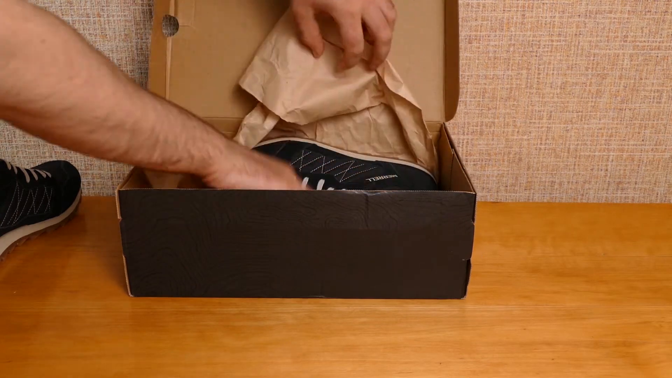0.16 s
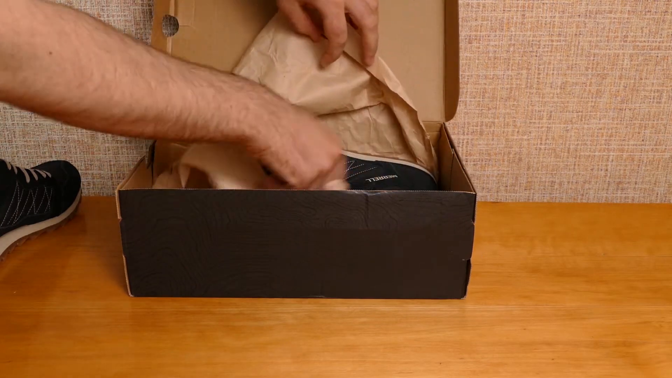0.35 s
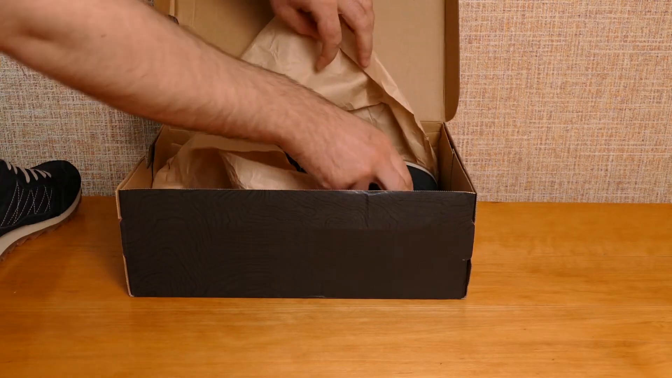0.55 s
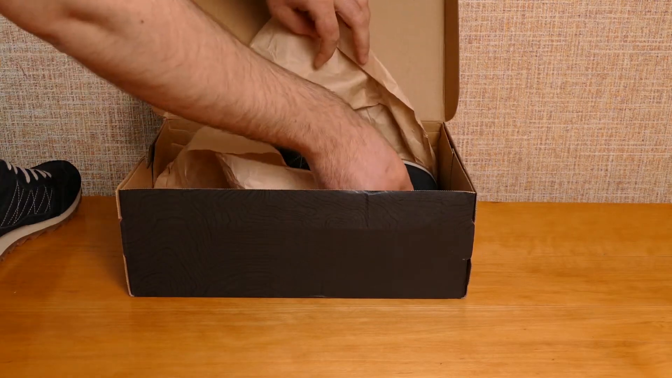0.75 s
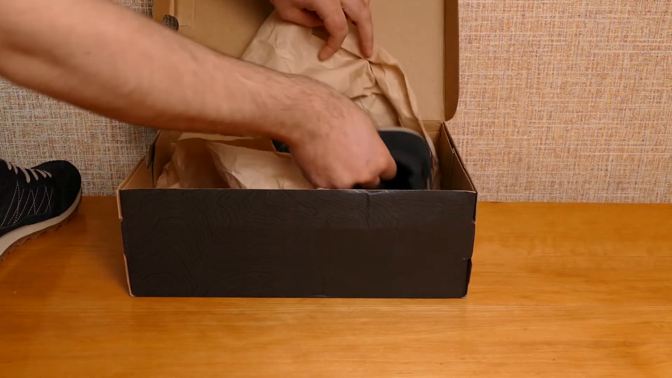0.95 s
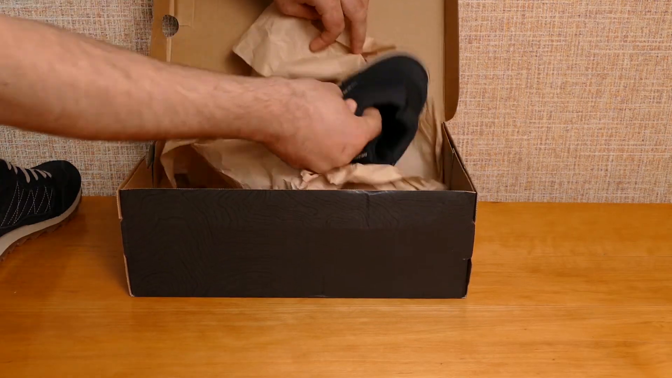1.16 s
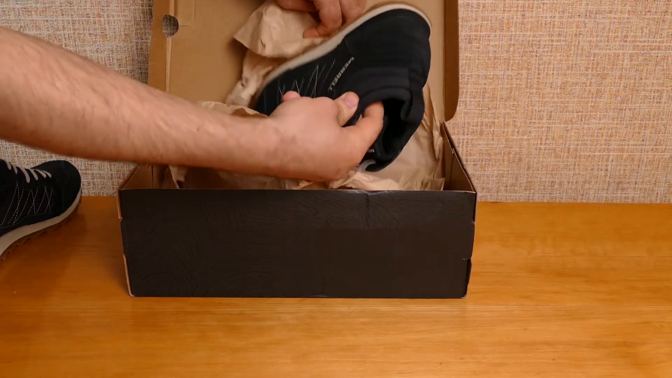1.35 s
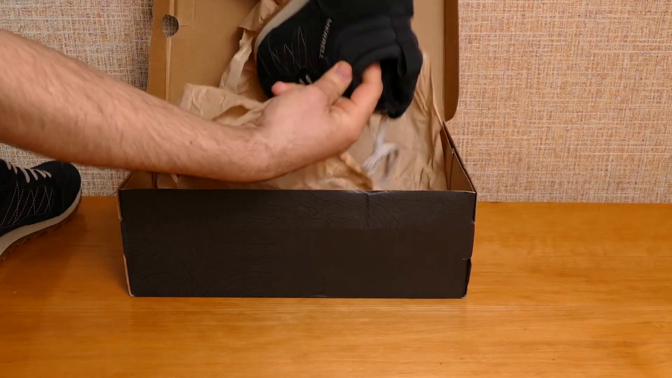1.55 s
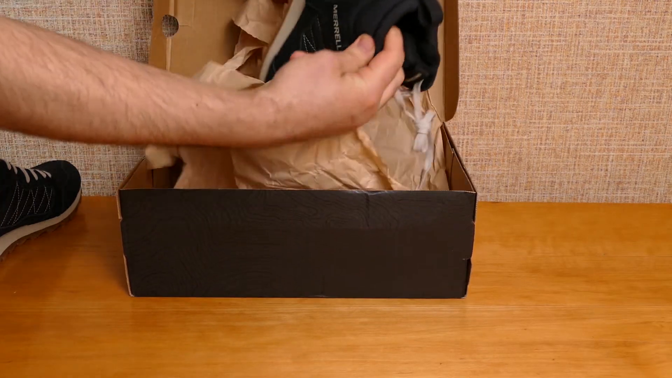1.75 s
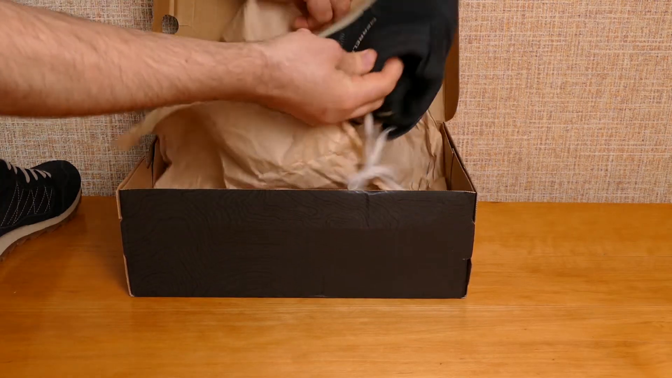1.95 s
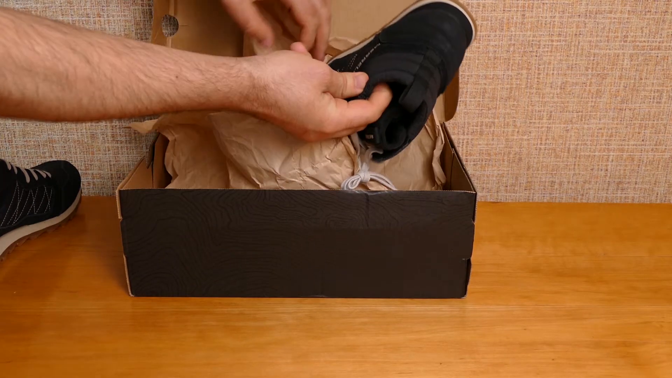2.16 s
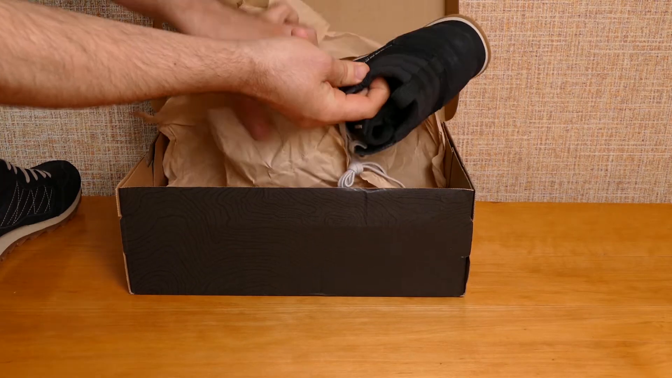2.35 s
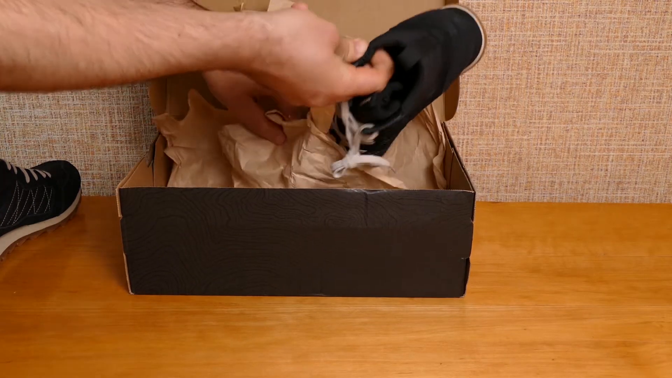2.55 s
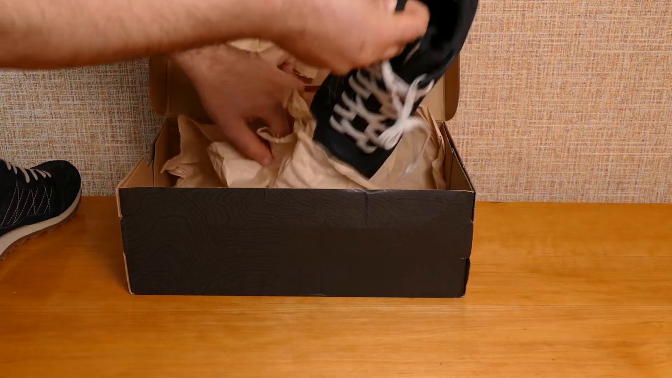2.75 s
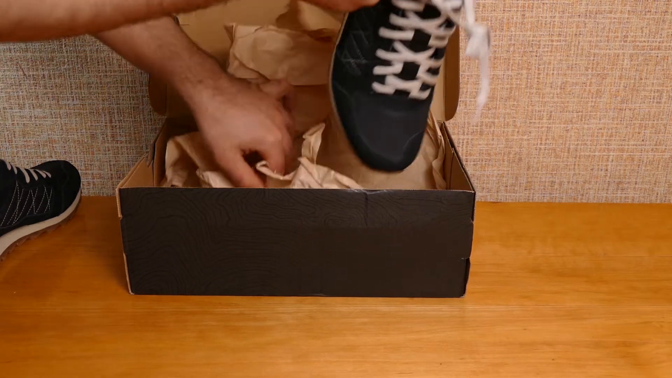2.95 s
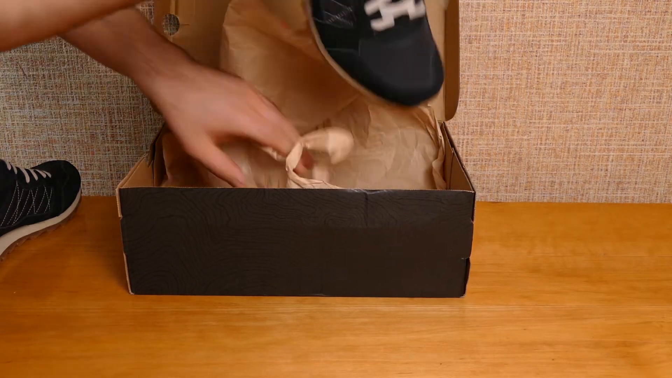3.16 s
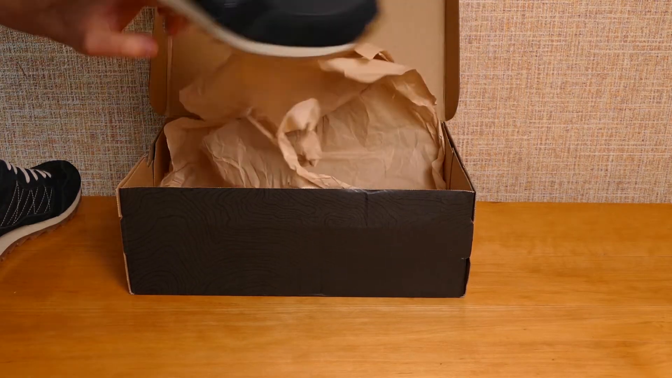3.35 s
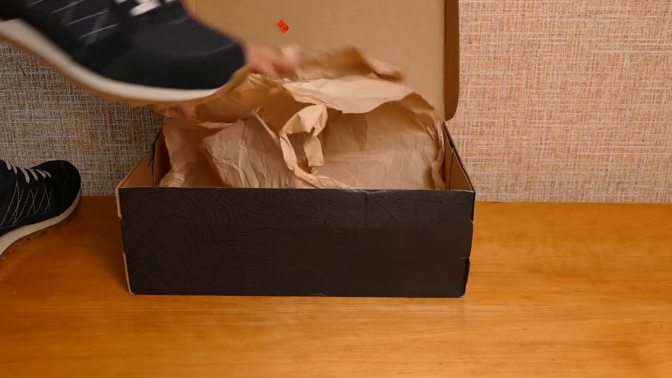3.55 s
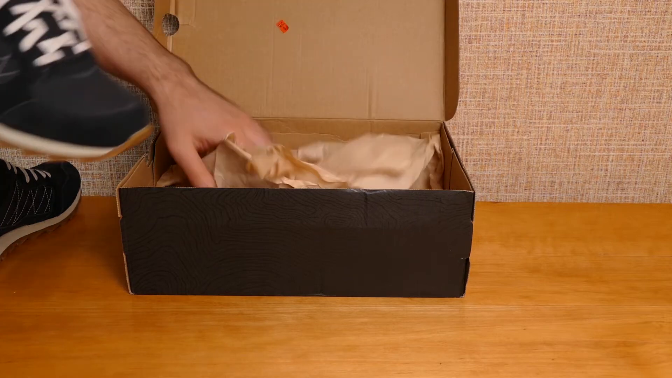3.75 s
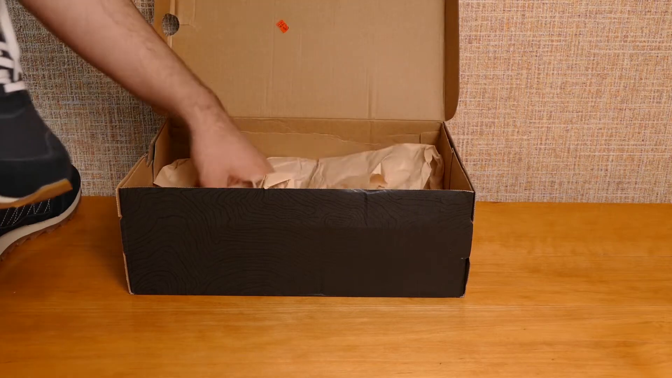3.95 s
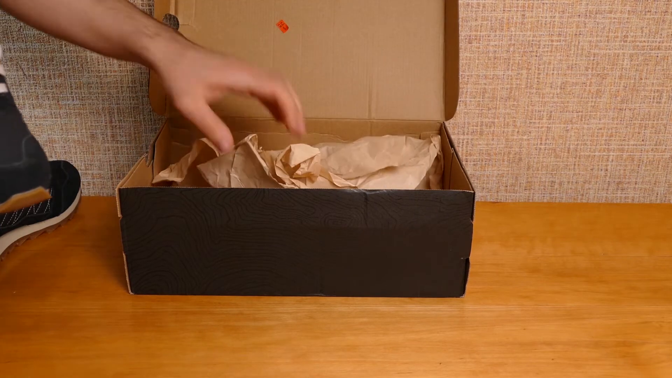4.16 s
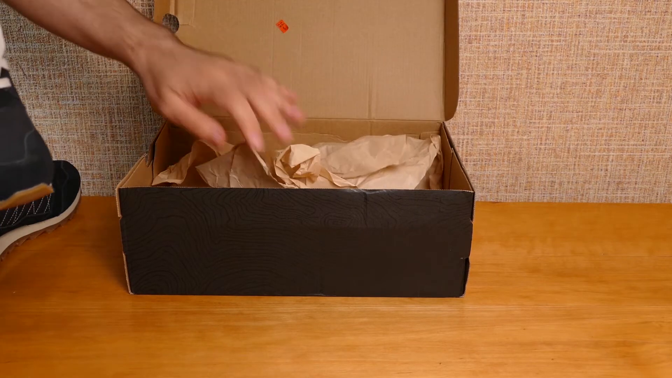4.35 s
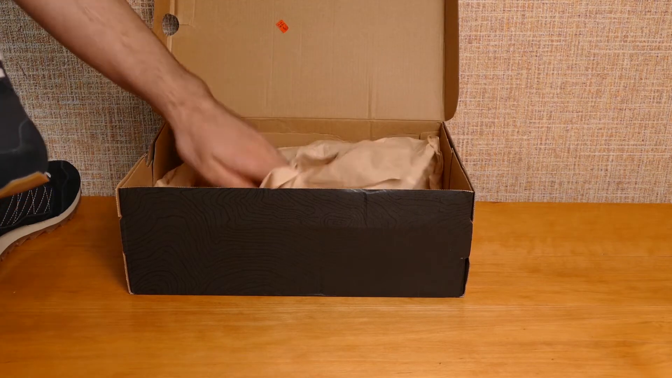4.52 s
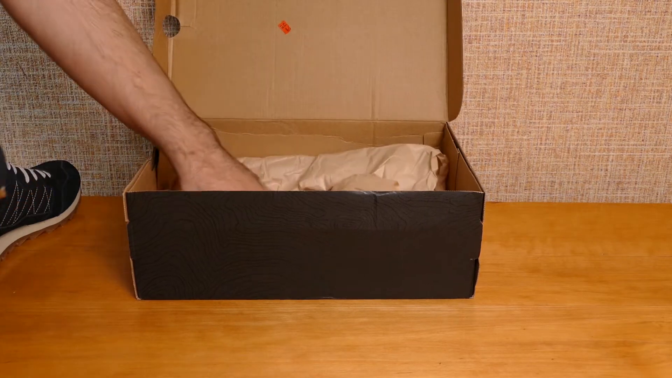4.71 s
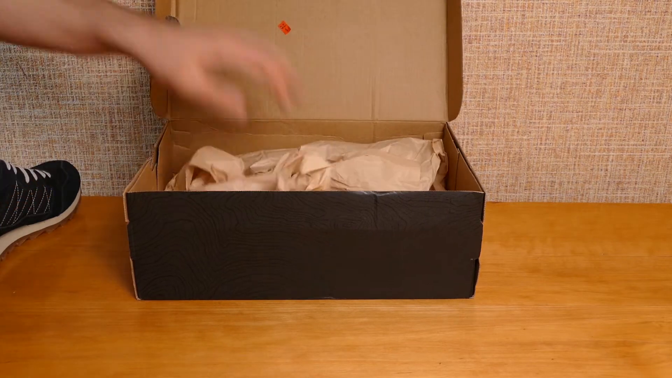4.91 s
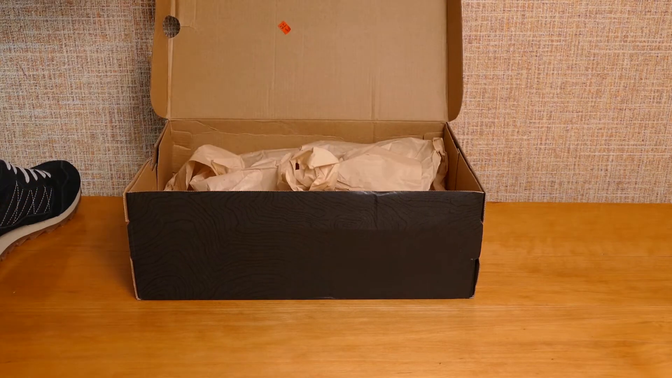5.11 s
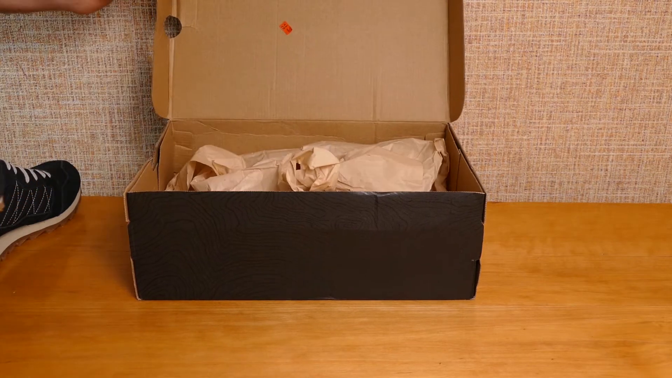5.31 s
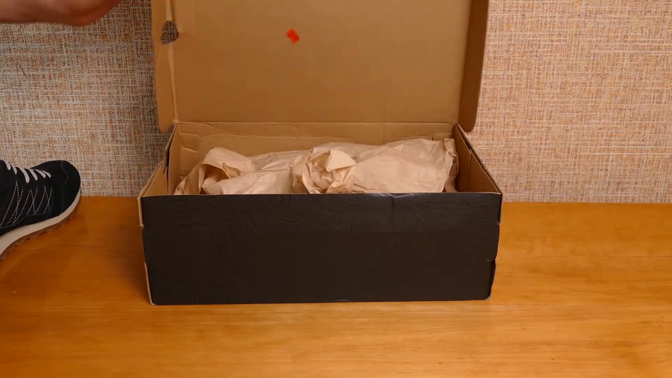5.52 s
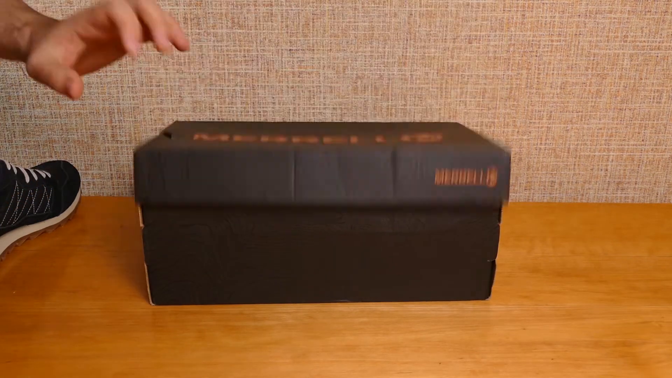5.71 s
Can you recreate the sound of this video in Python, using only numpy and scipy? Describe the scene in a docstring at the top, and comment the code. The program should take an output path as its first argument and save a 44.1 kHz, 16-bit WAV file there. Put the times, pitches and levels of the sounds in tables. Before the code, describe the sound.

Busy dry paper crinkling in a small room, strokes coming and going, hollow cardboard bumps beneath, then a box lid cracks and scrapes shut.

```python
"""Hands sweep packing paper aside in a cardboard shoebox, draw out a shoe, peel off its wrapping, stuff the
paper back and press it flat; at last the lid scrapes shut. At each stroke, and as the paper springs back,
flurries of clicks ring the facets of the sheet; single creases crack, folds pop as they flip, and soft
knocks excite the modes of the box. Underneath lies a faint hush with a narrow steady hiss.
The stereo microphone stands about a metre away in a small furnished room."""
import sys
import numpy as np
from scipy import signal
from scipy.fft import rfft, irfft
from scipy.io import wavfile
from scipy.ndimage import uniform_filter1d

SR = 44100
rng = np.random.default_rng(int(sys.argv[2]) if len(sys.argv) > 2 else 0)


def inscribe(sig):
    """Save sig as 16-bit PCM at rate SR to the path in sys.argv[1].

    A 1-D sig is mono; a 2-D sig holds one channel per row.
    Samples are clipped to [-1, 1] before scaling.
    """
    pcm = np.round(np.clip(np.atleast_2d(sig).T, -1, 1) * 32767)
    wavfile.write(sys.argv[1], SR, pcm.astype(np.int16))


N = 259308
TIME = np.arange(N) / SR


def undb(db):
    """Decibels to gain."""
    return 10 ** (np.asarray(db) / 20)


def unit(x):
    """Scale to rms 1."""
    return x / np.sqrt(np.mean(x ** 2))


def fade(t, t60):
    """Exponential decay by 60 dB in t60 seconds."""
    return np.exp(-np.log(1000) * t / t60)


def convolve(x, response):
    """Pass a sound through an impulse response."""
    return signal.fftconvolve(x, response)[:len(x)]


def filter_sos(x, order, hz, kind="lowpass"):
    """Causal Butterworth filter."""
    return signal.sosfilt(signal.butter(order, hz, kind, fs=SR, output="sos"), x)


def colour(x, points, size=4096):
    """Minimum-phase filter through (f/Hz, level/dB) points; white noise keeps its power."""
    hz, db = np.transpose(points)
    bins_hz = np.fft.rfftfreq(size, 1 / SR)
    gain = unit(undb(np.interp(np.log(bins_hz + 1), np.log(hz), db)))
    # folding the cepstrum forward makes the response causal
    cepstrum = irfft(np.log(gain))
    cepstrum[1:size // 2] *= 2
    cepstrum[size // 2 + 1:] = 0
    return convolve(x, irfft(np.exp(rfft(cepstrum))))


def walk(rate):
    """Smooth random wander with a spread of about 1, drawn afresh `rate` times a second."""
    k = int(SR / rate)
    steps = np.repeat(rng.standard_normal(N // k + 1), k)
    return unit(uniform_filter1d(steps, k)[:N])


def burst(t60):
    """The ring of countless equally strong damped modes: a short decaying noise with an even spectrum."""
    t = np.arange(int(t60 * SR)) / SR
    envelope = fade(t, t60)
    ring = rng.standard_normal(SR)[:len(t)] * envelope
    # flatten the spectrum and restore the decay by turns
    for _ in range(3):
        even = irfft(np.exp(1j * np.angle(rfft(ring))), len(t))
        power = uniform_filter1d(even ** 2, size=len(t) // 8)
        ring = even * envelope / np.sqrt(np.abs(power) + 1e-15)
    return ring


def add(track, s, sound):
    """Mix a sound in at time s."""
    i = int(s * SR)
    track[i:i + len(sound)] += sound[:N - i]


def paper():
    """The same clicks tick in the creases, ring the wider sheets and drum on the cardboard under them."""
    # the cardboard's colour: f/Hz, level/dB
    wall_colour = [(40, -38.5), (92, -24), (135, -13), (200, -0.5), (320, 0.5), (405, 7), (510, 2),
                   (660, 2.5), (1020, 3), (1400, 3.5), (3000, -34.5)]
    creases_db, sheets_db, walls_db = 0.45, 0.7, -0.5
    effort, flex, pressure = handling()
    crease_db = 20 * np.log10(effort)
    clicks = buckling(per_s=1400, spread_db=2.0, flurry_db=0.0, shift_db=1.0, count=24)
    walls = colour(facets(clicks, t60=0.063), wall_colour)
    ticking = effort * creases(clicks, crease_db, firm_db=-45.5, dulling=0.42)
    ringing = flex * sheets(clicks, crease_db)
    return undb(creases_db) * ticking + undb(sheets_db) * ringing + undb(walls_db) * pressure * walls


def handling():
    """Gains of creases, sheets and box: the hand pushes in each stroke, then the paper springs back."""
    # strokes of the hands: the top sheet is swept aside; from 0.42 s fingers find the shoe and draw it out;
    # from 1.96 s its wrapping is peeled off; from 3.55 s the paper is stuffed back, from 4.41 s pressed
    # flat; at 5.2 s it stirs as the box is nudged.
    # t/s, attack/s, hold/s, crease level/dB, flexing of sheets re creases/dB, pressure on the box
    # re creases/dB, spring-back re push/dB, spring-back hold/s
    strokes = [ (0.0, 0.00067, 0.0025, -36, -1, -4.5, -4.5, 0.18),
               (0.123, 0.066, 0.037, -38, -1, -10.5, -8.5, 0.2),
               (0.422, 0.033, 0.022, -47.5, 0, -13, -7, 0.069),
               (0.562, 0.02, 0.04, -53.5, -13, -15, -3, 0.03),
               (0.613, 0.04, 0.032, -51, -0.5, -11.5, -9, 0.09),
               (0.753, 0.064, 0.058, -44.5, -6, -15.5, -2, 0.13),
               (0.921, 0.14, 0.044, -46, 2.5, -7, -5.5, 0.045),
               (1.125, 0.036, 0.077, -41.5, -5, -14, -3.5, 0.11),
               (1.366, 0.0043, 0.035, -44.5, -0.5, -11, -1, 0.12),
               (1.51, 0.026, 0.1, -43, -1, -14, -6, 0.18), (1.786, 0.029, 0.066, -57.5, -3, -13, 1.5, 0.14),
               (1.958, 0.022, 0.067, -42.5, -6.5, -16.5, -3, 0.17),
               (2.24, 0.012, 0.16, -46.5, -4.5, -16, -4, 0.047),
               (2.364, 0.12, 0.1, -42.5, 0, -12, -3, 0.12),
               (2.695, 0.071, 0.047, -48, -1.5, -9, -14, 0.028),
               (2.837, 0.0055, 0.058, -46, -8, -14, -5.5, 0.18),
               (3.008, 0.03, 0.24, -53.5, -6.5, -14, -16.5, 0.23),
               (3.545, 0.0068, 0.04, -57, -23, -13, -10, .03),
               (3.575, 0.025, 0.1, -47, -5.5, -6, 1.5, 0.18),
               (3.683, 0.2, 0.075, -42.5, -9, -1, -12, 0.056),
               (3.988, 0.047, 0.13, -48, -8, -10, -29, 0.068),
               (4.411, 0.005, 0.017, -61, -10, -12.5, 5, 0.024),
               (4.428, 0.023, 0.017, -47, -13, -7, -1, 0.12),
               (4.574, 0.074, 0.025, -37.5, -2, -6, -13, 0.24),
               (4.871, 0.032, 0.062, -52.5, -8, -13.5, -13, 0.078),
               (5.204, 0.053, 0.021, -64.5, -17, -8, -14.5, 0.24)]
    spring_flex_db, spring_pressure_db = -2.5, -15.5  # re creases, once the hand lets go
    power = np.zeros((3, N))
    for s, attack, hold, db, flex_db, pressure_db, spring_db, spring_s in strokes:
        push = undb(db) * gesture(s, attack, hold)
        power += np.outer(undb([0, flex_db, pressure_db]), push) ** 2
        spring = undb(db + spring_db) * gesture(s + hold, attack, spring_s)
        # the box is left halfway, in dB, between the stroke's pressure and that of loose paper
        left_pressure_db = (pressure_db + spring_pressure_db) / 2
        power += np.outer(undb([0, spring_flex_db, left_pressure_db]), spring) ** 2
    return np.sqrt(power + 1e-14)


def gesture(start, attack, hold):
    """Rises, holds and dies away as the paper comes to rest."""
    release_t60_s = 0.22
    t = TIME - start
    return np.clip(t / attack, 0, 1) * fade(np.maximum(t - attack - hold, 0), release_t60_s)


def buckling(per_s, spread_db, flurry_db, shift_db, count):
    """Click trains, one per facet or contact: they come in flurries, and the load shifts between them."""
    flurry = undb(flurry_db * walk(70))
    trains = np.zeros((count, N))
    for train in trains:
        when, size, side = rng.random((int(per_s * N / SR / count), 3)).T
        train[(when * N).astype(int)] = np.sign(side - .5) * undb(-spread_db * np.log(size + 0.023))
        train *= flurry * undb(shift_db * walk(12))
    # the hand feeds in energy evenly, however the clicks share it out
    power = uniform_filter1d(np.sum(trains ** 2, axis=0), int(.06 * SR))
    return trains / np.sqrt(np.abs(power) + 1e-9)


def facets(trains, t60):
    """Every facet answers its clicks with its own short ring."""
    rings = [burst(t60 * rng.uniform(0.41, 1.66)) for _ in trains]
    answers = (signal.oaconvolve(train, ring / np.linalg.norm(ring))[:N] for train, ring in zip(trains, rings))
    return unit(sum(answers))


def creases(clicks, crease_db, firm_db, dulling):
    """Creases tick as sheet rubs on sheet, stiffer ones crunch; a gentle touch dulls the treble."""
    # f/Hz, level/dB
    crease_colour = [(500, -63), (1500, -6), (2900, -2.5), (3800, -1), (5200, -3), (6500, -6), (8200, -8),
                     (9500, -3.5), (11000, -7), (12200, -11), (12600, -16.5), (15000, -31)]
    crinkle_db = -4.5  # crunches re the even ticking
    crinkle_merge = .25  # dB the crunches lose per dB of a firmer stroke, as they run together
    ticks = facets(clicks, t60=0.0043) + undb(-5) * rng.standard_normal(N)
    share = undb(crinkle_db - crinkle_merge * np.maximum(crease_db - firm_db, 0))
    runs = avalanches(per_s=130, spread_db=8.5, length_s=0.0054)
    crunch = np.hypot(1, share * runs) / np.hypot(1, share)
    sound = colour(ticks * crunch, crease_colour)
    body = signal.sosfiltfilt(signal.butter(4, 6300, fs=SR, output="sos"), sound)
    treble = sound - body
    treble_db = np.clip(dulling * (crease_db - firm_db), -7, .3) + 1.15 * walk(35)  # and it flickers
    return body + undb(treble_db) * treble


def avalanches(per_s, spread_db, length_s):
    """Gain of the crunches: a stiff crease trips its neighbours in a run that swells and dies in milliseconds."""
    triggers = np.zeros(N)
    when, size = rng.random((int(per_s * N / SR), 2)).T
    triggers[(when * N).astype(int)] = undb(spread_db * size) ** 2
    swell = np.hanning(int(length_s * SR)) ** 2
    return unit(np.sqrt(np.abs(signal.fftconvolve(triggers, swell, "same"))))


def sheets(clicks, crease_db):
    """A bent sheet rings from its lowest mode upward; a harder stroke bends a wider, deeper sheet."""
    # f/Hz, level/dB
    sheet_colour = [(600, -8.5), (1000, -3), (1450, -2.5), (2000, -1.5), (2400, -2), (2900, -10.5)]
    wad_hz = 1435  # lowest mode of a tight wad
    opening_db, octave_db = -49.5, 12.5  # crease level that starts to open it, rise that halves the mode
    hz = np.geomspace(600, 2900, num=10)
    lowest_hz = wad_hz * .5 ** (np.maximum(crease_db - opening_db, 0) / octave_db)
    level = undb(np.interp(hz, *np.transpose(sheet_colour))) * np.sqrt(hz / 6500)
    weight = level[:, None] / (1 + (lowest_hz / hz[:, None]) ** 12)
    return np.sum(weight * patches(facets(clicks, t60=.016), hz, patchy_db=-1.77, rate=24), axis=0)


def patches(noise, centres_hz, patchy_db, rate):
    """Split a sound into bands that each swell and ebb alone, as folds open and close."""
    edge = np.sqrt(centres_hz[1] / centres_hz[0])
    bands = [filter_sos(noise, 3, (hz / edge, hz * edge), "bandpass") for hz in centres_hz]
    return np.array([unit(band * undb(patchy_db * walk(rate))) for band in bands])


def snaps():
    """A stiff crease pops through with one sharp crack and sets off its neighbours."""
    # single creases: t/s, crack level/dB
    snap_events = [(0.2142, -24.5), (0.5575, -41), (0.6375, -36.5), (0.8168, -43), (0.887, -30),
                   (1.1037, -26.5), (1.1943, -28), (1.3798, -30), (1.5436, -27), (1.8326, -42),
                   (1.878, -42), (1.9814, -34), (2.0473, -30.5), (2.1814, -37), (2.2659, -30),
                   (2.4613, -29.5), (2.6233, -28), (2.8245, -27.5), (3.4426, -55.5), (3.5478, -57),
                   (3.5961, -42), (3.7968, -33), (4.0178, -40.5), (4.4149, -55), (4.5712, -29.5),
                   (5.075, -62), (5.128, -60.5), (5.485, -73)]
    flurry_db, flurry_growth = -26.5, 0.63  # flurry for a crack of 0 dB, and its dB per dB of crack
    out = np.zeros(N)
    for s, crack_db in snap_events:
        add(out, s, undb(crack_db) * burst(t60=0.0066))
        flurry = burst(t60=0.17)
        ticks = unit(undb(7.2 * walk(700)[:len(flurry)]))
        add(out, s, undb(flurry_db + flurry_growth * crack_db) * flurry * ticks)
    return colour(out, [(200, -22.5), (900, -11.0), (1900, -3.5), (4500, 5.0), (7500, -5.0),
                        (10500, 0.5), (12200, -8.5), (13000, -23.5), (15000, -33.0)])


def folds(t60, ring_db):
    """A wide fold flips inside out with a hollow pop, and the taut sheet rings on its pitch for a moment."""
    # t/s, pitch f/Hz, level/dB
    fold_events = [(0.125, 860, -34), (0.465, 2150, -36.5), (0.6375, 2070, -32), (1.832, 1957, -38.5),
                   (1.879, 1920, -40.5), (2.3172, 1557, -26.5), (2.3785, 1540, -32), (2.508, 1950, -26.5),
                   (2.549, 1560, -26), (2.579, 1960, -26.5), (2.751, 1500, -27.5), (4.668, 860, -27)]
    out = np.zeros(N)
    for s, hz, db in fold_events:
        pop = burst(t60)
        t = np.arange(len(pop)) / SR
        ring = undb(ring_db) * np.sin(2 * np.pi * hz * t) * fade(t, t60)
        add(out, s, undb(db) * filter_sos(pop + ring, 2, (hz * .77, hz * 1.3), "bandpass"))
    return out


def knocks(push_cycles, judder_db):
    """Bumps rock the box, then its modes fade; its walls clatter, louder and brighter under a harder contact."""
    # t/s, strength level/dB, hardness of the contact f/Hz, rocking/s, extra level of the floor's thud/dB
    knock_events = [(0.01, -55, 535, 0.079, -14), (0.211, -50, 1030, .012, 2), (0.238, -46, 225, 0.03, -1),
                    (0.838, -42, 217, 0.014, 1.5), (0.945, -61, 170, .07, 3),
                    (1.055, -51.5, 341, .05, -6.5), (1.154, -43.5, 334, 0.008, -4),
                    (1.28, -50, 280, 0.055, -19), (1.345, -54, 440, 0.022, -12),
                    (2.75, -47.5, 530, 0.0046, -20), (3.601, -52, 440, 0.032, 1.5),
                    (3.812, -50.5, 428, 0.04, -26), (4.451, -54.5, 432, 0.054, -6.5),
                    (4.899, -41.5, 162, 0.029, 2.5), (5.06, -48.5, 175, 0.037, 6),
                    (5.261, -44, 315, 0.033, 4.5), (5.772, -57.5, 720, .005, -4),
                    (5.811, -48, 480, 0.019, -4)]
    # modes of the box on its table, the floor's thud first: f/Hz, level/dB, t60/s
    box_modes = [(137.7, -4.5, 0.19), (218.2, -8.5, 0.12), (273, -2.5, 0.1), (394, -7.5, 0.17),
                 (460, -12, 0.072), (675, -17.5, 0.1), (1030, -7.5, .1)]
    # colour of the rattling walls: f/Hz, level/dB
    clatter_colour = [(60, -41.5), (110, -24.5), (165, 0.5), (320, 0.5), (410, 11), (520, 1.5), (700, 10),
                      (1900, -6), (3000, -17), (10000, -17.5)]
    rattle_hz, rattle_db = 495, 2  # harder contacts than this rattle the walls, at this level re the knock
    box_low_hz = 115.5
    t = np.arange(SR // 2) / SR
    ring, clatter = np.zeros(N), np.zeros(N)
    for s, knock_db, hard_hz, rock_s, thud_db in knock_events:
        push = 1 - np.exp(-(t * hard_hz / push_cycles) ** 2)  # a softer contact pushes for longer
        judder = undb(judder_db * walk(120)[:len(t)] * fade(t, .4))
        for k, (hz, db, t60) in enumerate(box_modes):
            mode_db = knock_db + db + (thud_db if k == 0 else 0)
            detune, phase = rng.standard_normal(2)
            tone = np.sin(2 * np.pi * (hz * (1 + 0.015 * detune) * t + phase))
            mode = tone * fade(np.maximum(t - rock_s, 0), t60)
            # a soft contact hardly excites the high modes
            add(ring, s, undb(mode_db) / (1 + (hz / hard_hz) ** 2) * mode * push * judder)
        shake = filter_sos(colour(burst(t60=0.12), clatter_colour), 4, hard_hz)
        shake *= push[:len(shake)]
        add(clatter, s, undb(knock_db + rattle_db) / (1 + (rattle_hz / hard_hz) ** 6) * unit(shake))
    return filter_sos([ring, clatter], 4, box_low_hz, "highpass")


def lid():
    """The lid's flaps catch the rim with bright cracks, and it sticks and slips along the walls of the box."""
    # the lid sliding down over the box: t/s, level/dB
    slide = [(5.6, -100), (5.738, -68), (5.743, -54), (5.758, -45.5), (5.765, -49), (5.779, -35.5),
             (5.792, -43), (5.805, -40.5), (5.835, -43), (5.88, -49)]
    # the flaps catching the rim: t/s, level/dB
    catches = [(5.741, -50), (5.761, -35.5), (5.769, -52)]
    # colour of the scrape: f/Hz, level/dB
    scrape_colour = [(60, -50.5), (150, -18.5), (300, -10.5), (400, -1), (480, -24.5), (710, -11),
                     (820, -19), (1550, -11.5), (2000, -18), (2350, -14), (5000, -25.5), (11400, -27.5),
                     (15000, -54)]
    slips = buckling(per_s=1500, spread_db=1.0, flurry_db=3.5, shift_db=0.0, count=8)
    slide_gain = undb(np.interp(TIME, *np.transpose(slide), left=-140))
    scrape = colour(facets(slips, t60=0.01), scrape_colour) * slide_gain
    crack = colour(burst(t60=0.054), [(500, -14), (2000, -9), (11000, 0), (15000, -10)])
    for s, db in catches:
        add(scrape, s, undb(db) * crack)
    return scrape


def hollow(x):
    """The air in the open box lifts the sound at its standing waves."""
    # standing waves: f/Hz
    standing_hz = [537, 1048, 1392, 1555, 1990]
    width_hz, lift_db = 22, 3.5
    rings = sum(signal.lfilter(*signal.iirpeak(hz, hz / width_hz, fs=SR), x) for hz in standing_hz)
    return x + (undb(lift_db) - 1) * rings


def room(x, wet_db, near_db, side_db, t60):
    """The room echoes; short reflections nearby add to the difference between the two capsules."""
    mid = undb(wet_db) * reflections(x, t60)
    side = undb(wet_db) * reflections(x, t60) + undb(near_db) * reflections(x, t60=.03)
    side = undb(side_db) * colour(side, [(100, -4.5), (330, -10.0), (550, -1.0), (2000, -0.5),
                                         (7000, 0.5), (10000, 0.5), (12500, 5), (20000, 5)])
    return np.array([x + mid + side, x + mid - side]) / np.sqrt(1 + undb(2 * wet_db))


def reflections(x, t60, count=9):
    """Diffuse echoes, whose pattern changes as the sounding spot moves about the box."""
    places = np.array([walk(30) for _ in range(count)])
    places /= np.linalg.norm(places, axis=0)
    tails = [burst(t60) for _ in places]
    return sum(convolve(x * place, tail / np.linalg.norm(tail)) for place, tail in zip(places, tails))


def background():
    """A faint stereo hush of coloured noise, with a narrow steady hiss in the middle."""
    # f/Hz, level/dB
    hush_colour = [(30, -20), (70, -7.5), (140, -9), (400, 0.5), (700, -2.5), (2000, -11), (5000, -23),
                   (11500, -21), (12500, -37), (15000, -31.5)]
    hiss_hz, hiss_width_hz, hiss_db = 2810, 120, -87
    middle, sides = (colour(rng.standard_normal(N), hush_colour) for _ in range(2))
    hush = middle + undb(-5.0) * sides * np.array([[1], [-1]])
    edges_hz = (hiss_hz - hiss_width_hz / 2, hiss_hz + hiss_width_hz / 2)
    hiss = unit(filter_sos(rng.standard_normal(N), 2, edges_hz, "bandpass"))
    return undb(-80.5) * hush + undb(hiss_db) * hiss


def scene():
    """Paper, box and lid in the room, over a faint hush; the ring of the box comes without echoes."""
    ring, clatter = knocks(push_cycles=3.35, judder_db=3)
    in_box = hollow(paper() + snaps() + clatter + lid())
    pops = folds(t60=0.09, ring_db=-15.5)
    sound = room(in_box + pops, wet_db=1.0, near_db=-0.5, side_db=-5.5, t60=.24)
    balance = undb(np.array([[-.2], [.2]]))  # a touch to the right
    return (sound + ring) * balance + background()


def record(dry):
    """The microphone's housing carves two narrow dips; the top is cut off."""
    # dips in the response: f/Hz, width/Hz, level/dB
    housing_dips = [(574, 44, -23), (2664, 217, -13.5)]
    top_hz = 15500
    for hz, width_hz, depth_db in housing_dips:
        band = signal.lfilter(*signal.iirpeak(hz, hz / width_hz, fs=SR), dry)
        dry = dry - (1 - undb(depth_db)) * band
    return signal.sosfilt(signal.ellip(8, .2, 70, top_hz, fs=SR, output="sos"), dry)


dry = scene()
out = record(dry)
inscribe(out)
```